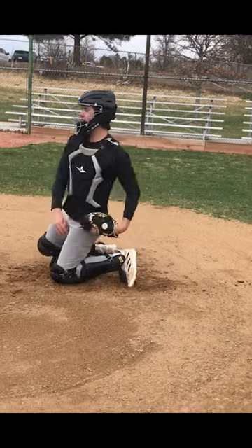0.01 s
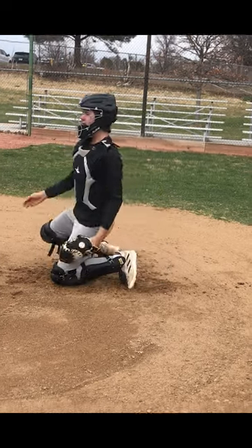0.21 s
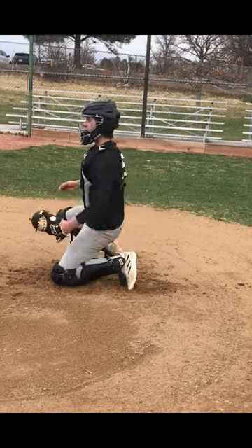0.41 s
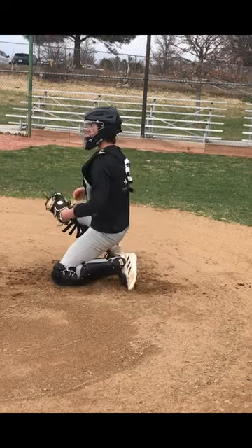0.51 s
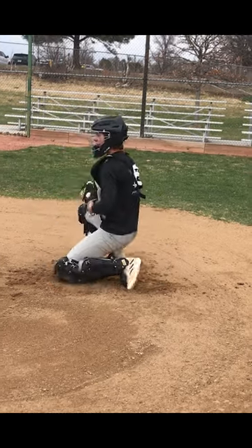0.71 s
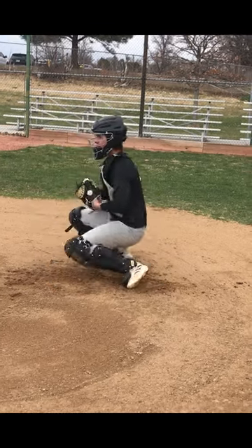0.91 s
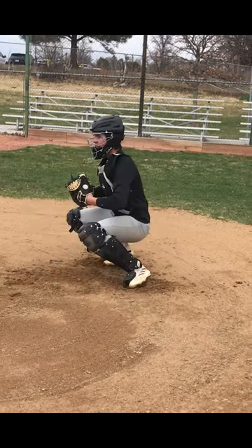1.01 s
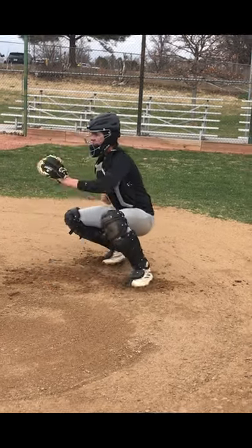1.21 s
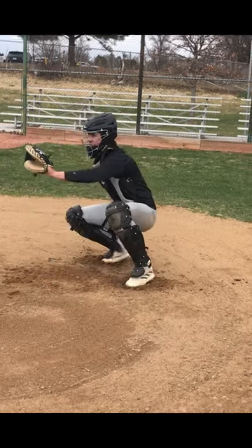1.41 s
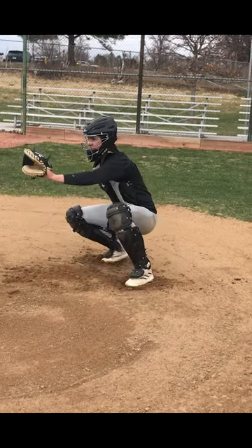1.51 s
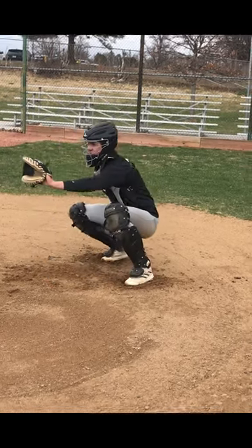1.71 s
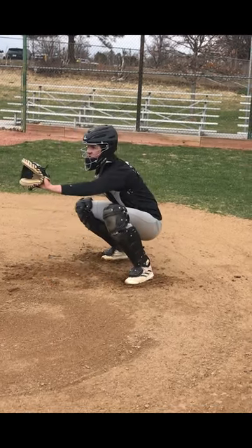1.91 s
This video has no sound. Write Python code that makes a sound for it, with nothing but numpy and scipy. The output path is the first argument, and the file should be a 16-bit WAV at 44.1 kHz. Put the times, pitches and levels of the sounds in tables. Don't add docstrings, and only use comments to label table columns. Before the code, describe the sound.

One sharp leathery mitt pop comes early, trailed at once by clicking guards and soft padded thuds, then faint gritty shuffling that settles into quiet wind rumble outdoors, captured by a handheld phone.

```python
import sys
import numpy as np
from scipy import signal
from scipy.fft import rfft, irfft
from scipy.io import wavfile
from scipy.ndimage import uniform_filter1d

SR = 44100
rng = np.random.default_rng(int(sys.argv[2]) if len(sys.argv) > 2 else 0)


def transcribe(signal):
    frames = np.atleast_2d(signal).T
    limited = np.clip(frames, -1, 1)
    pcm = np.round(limited * 32767).astype(np.int16)
    wavfile.write(sys.argv[1], SR, pcm)


def nominal_scale(level):
    x = np.asarray(level, float) / 20
    return 10 ** x


N = 88200


def curve(points, hz):
    f, db = np.transpose(points)
    f = np.r_[f[0] * .6, f, f[-1] * 1.1]
    db = np.r_[-50, db, -60]
    return nominal_scale(np.interp(np.log(hz + 1), np.log(f), db))


def evened(x):
    return x / np.sqrt(np.mean(x ** 2) + 1e-20)


def coloured(x, points, tilt_db=0):
    hz = np.fft.rfftfreq(len(x), 1 / SR)
    tilt = nominal_scale(tilt_db * np.log2(hz / 4000 + 0.0009))
    return evened(irfft(rfft(x) * curve(points, hz) * tilt, len(x)))


def add(mix, start_s, sound):
    part = mix[round(start_s * SR):][:len(sound)]
    part += sound[:len(part)]


def ring(db, hz, t60_s, rise_s=0.0003):
    t = np.arange(6000) / SR
    envelope = nominal_scale(db - 60 * t / t60_s) * (1 - np.exp(-t / rise_s))
    return envelope * np.sin(2 * np.pi * hz * t)


def burst(db, t60_s, points, tilt_db=0):
    t = np.arange(4096) / SR
    envelope = nominal_scale(db - 60 * t / t60_s) * np.minimum(t / 0.00026, 1)
    return envelope * coloured(rng.standard_normal(4096), points, tilt_db)


def snap(db, points):
    n = np.arange(1024)
    pulse = coloured(n == 64, points)
    return -nominal_scale(db) * pulse / pulse.max() * np.minimum(n / 40, 1)


def bed(points, size, patchy_db, flicker_db):
    frames = 4 * N // size + 5
    hz = np.fft.rfftfreq(size, 1 / SR)
    real, imag, patches = rng.standard_normal((frames, len(hz), 3)).T
    patches = uniform_filter1d(patches, size=8, axis=0)
    patches = evened(uniform_filter1d(patches, size=8, axis=1))
    flicker = evened(uniform_filter1d(rng.standard_normal(frames), size=4))
    level = nominal_scale(patchy_db * patches + flicker_db * flicker)
    spectra = (real + 1j * imag) * curve(points, hz)[:, None] * level
    return evened(signal.istft(spectra, nperseg=size, noverlap=3 * size // 4)[1][:N])


def air():
    wind_db, road_db = -50.5, -55
    # time in seconds, wind level in dB, road level in dB.
    gusts = [(0.0, -52.5, -55.5), (0.23, -53.5, -55.5), (0.56, -52, -57), (0.73, -50.5, -56.5),
             (1.09, -52.5, -57), (1.54, -52.5, -55.5), (2.0, -52, -58)]
    # frequency in Hz, level in dB per Hz.
    wind_spectrum = [(28, -25), (42, 0), (70, -1.5), (115, 1), (160, -6.5), (270, -10), (380, -18),
                     (500, -28)]
    # frequency in Hz, level in dB per Hz.
    road_spectrum = [(330, -9.5), (520, -13.5), (680, -2.5), (950, -1.5), (1650, -17.5), (2800, -30.5),
                     (5000, -34), (15500, -41)]
    s, wind_course_db, road_course_db = np.transpose(gusts)
    t = np.arange(N) / SR
    wind_gain = nominal_scale(wind_db + np.interp(t, s, wind_course_db - wind_course_db.mean()))
    road_gain = nominal_scale(road_db + np.interp(t, s, road_course_db - road_course_db.mean()))
    wind = wind_gain * bed(wind_spectrum, size=2048, patchy_db=.2, flicker_db=.1)
    road = road_gain * bed(road_spectrum, size=512, patchy_db=.6, flicker_db=.4)
    return wind + road


def scuffs():
    grains_per_s, grain_db, hiss_gain = 7000, 2.6, .8
    # peak in seconds, rise in seconds, fall in seconds, rms in dB, brightness in dB per octave.
    strokes = [(.02, 0.095, 0.15, -61, -4), (.352, 0.011, 0.011, -51.5, -6),
               (.37, 0.066, 0.038, -55.5, -4.5), (.393, .012, 0.017, -64.5, -3.5),
               (.47, 0.061, 0.063, -65.5, -5), (0.689, 0.11, 0.016, -63, -0.5),
               (.722, 0.018, 0.02, -52.5, 1), (.727, 0.008, 0.011, -65, -6), (.755, 0.018, 0.03, -60, 1.5),
               (.86, 0.1, 0.22, -63, -6.5), (1.205, .012, 0.016, -69, 8), (1.33, 0.12, 0.12, -73.5, 0.5),
               (1.46, .025, .025, -64, -7), (1.487, 0.026, 0.015, -63.5, -4), (1.488, 0.019, 0.011, -75, 3),
               (.55, 0.041, 0.053, -76, 0), (1.08, 0.086, 0.14, -82, 6), (1.8, .1, 0.17, -73.5, -0.5)]
    # frequency in Hz, level in dB per Hz.
    grit_spectrum = [(710, -48), (1200, -2.5), (2570, -7), (3110, -8), (7810, -15), (8510, -12),
                     (15500, -23.5)]
    t, out = np.arange(N) / SR, np.zeros(N)
    sizes = nominal_scale(grain_db * np.minimum(rng.exponential(1, N), 5)) * rng.choice([-1., 1.], N)
    grains = evened(sizes * (rng.random(N) < grains_per_s / SR))
    grit = grains + hiss_gain * rng.standard_normal(N)
    for peak_s, rise_s, fall_s, db, tilt_db in strokes:
        stroke = np.exp(-((t - peak_s) / np.where(t < peak_s, rise_s, fall_s)) ** 2)
        out += nominal_scale(db) * stroke * coloured(grit, grit_spectrum, tilt_db)
    return out


def pocket_air():
    level_db, first_db, swell_s, bite_s, t60_s = -5.3, -7.1, .0023, .00033, .009
    end_hz, sag_hz, sag_s = 300, 736, .0047
    t = np.arange(3000) / SR
    phase = 2 * np.pi * (end_hz * t + sag_hz * sag_s * (1 - np.exp(-t / sag_s)))
    swell_db = first_db * np.maximum(1 - t / swell_s, 0)
    decay_db = -60 * np.maximum(t - swell_s, 0) / t60_s
    return (1 - np.exp(-t / bite_s)) * nominal_scale(level_db + swell_db + decay_db) * np.sin(phase)


def pop():
    pop_s = .24715
    # start in seconds, rms in dB, T60 in seconds, brightness in dB per octave.
    cracks = [
        (0.2421, -51, 0.041, -3),
        (.2470, -29, .005, 2.5),
        (0.2481, -30, 0.008, 1.5),
        (0.249, -45, 0.045, 2),
        (0.2672, -48, 0.012, 4),
        (0.2648, -50, 0.008, 10),
    ]
    # frequency in Hz, level in dB per Hz.
    crack_spectrum = [(1700, -20), (2600, -5), (4200, -5), (5500, -2.5), (7500, -9.5), (9500, -22.5),
                      (12000, -29), (15500, -40)]
    # delay in seconds, level in dB, frequency in Hz, T60 in seconds.
    laces = [
        (0.0012, -31, 5900, 0.0073),
        (0.0018, -34, 4100, 0.010),
        (0.0013, -25, 7290, 0.008),
        (0.0014, -39, 4600, 0.0054),
        (.0005, -30, 2550, 0.013),
        (0.0033, -30, 2080, 0.013),
        (0.00093, -35, 2850, 0.009),
        (0.001, -39, 4400, 0.0065),
        (.0178, -40, 8200, .006),
        (0.0198, -45, 8400, .006),
    ]
    out = np.zeros(N)
    add(out, pop_s, pocket_air())
    add(out, pop_s + .00008, ring(.8, 1374, .0067, rise_s=.0012))
    add(out, pop_s + .00093, ring(-5.8, 200, .019, rise_s=.005))
    add(out, pop_s + .00004 - 64 / SR, snap(-11.5, crack_spectrum))
    for delay_s, db, hz, t60_s in laces:
        add(out, pop_s + delay_s, ring(db, hz, t60_s))
    for start_s, db, t60_s, tilt_db in cracks:
        add(out, start_s, burst(db, t60_s, crack_spectrum, tilt_db))
    return out


def click(out, start_s, db, t60_s, points):
    add(out, start_s, burst(db, t60_s, points))
    add(out, start_s - 50 / SR, snap(db + 5.5, points))


def slides():
    # start in seconds, level in dB, start pitch in Hz, pitch drop in Hz per second, length in seconds.
    glides = [
        (.2476, -25, 5900, 800000, .0026),
        (.3704, -35, 3800, 400000, .0022),
        (.3878, -41, 950, 9000, .0105),
    ]
    out = np.zeros(N)
    for start_s, db, hz, drop_hz_per_s, length_s in glides:
        t = np.arange(0, length_s, 1 / SR)
        envelope = nominal_scale(db) * np.sin(np.pi * t / length_s) ** .5
        add(out, start_s, envelope * np.sin(2 * np.pi * (hz - drop_hz_per_s * t / 2) * t))
    return out


def gear():
    # start in seconds, click level in dB, ring level in dB, ring frequency in Hz, ring T60 in seconds.
    knocks = [(0.2652, -44, -27, 1260, 0.011), (0.3035, -54, -50, 1160, 0.029),
              (0.3105, -56, -35, 1430, 0.014), (0.3112, -54, -44, 4700, .006),
              (.3165, -54, -46, 1000, .015), (0.3237, -49, -40, 1490, 0.0054),
              (0.3295, -45, -51, 1190, 0.016), (0.334, -33.5, -30.5, 1274, 0.012),
              (0.3371, -39, -36, 1950, 0.012), (0.3429, -41, -36, 1090, 0.012),
              (0.3466, -30.5, -39, 5960, 0.0039), (0.3478, -42, -38, 3300, 0.010),
              (0.3515, -43, -41, 1700, 0.014), (0.357, -41, -38, 1110, 0.014),
              (0.3681, -39, -37, 1140, 0.011), (.3702, -34.5, -47, 3530, 0.0099),
              (0.3718, -46, -28, 2820, 0.010), (0.3781, -50, -49, 750, .03), (0.3885, -60, -51, 770, 0.029),
              (.4590, -64, -49, 1550, 0.022), (.4900, -65, -49, 2230, 0.014),
              (0.599, -55.5, -57, 2520, 0.015), (0.675, -58, -51, 2600, .01), (.7195, -50, -46, 1910, .012),
              (0.7252, -57, -43, 2700, 0.02), (.7320, -56, -44.5, 2070, 0.021),
              (1.4890, -49, -52, 6760, 0.0031), (1.4945, -58, -57, 3500, .008)]
    # frequency in Hz, level in dB per Hz.
    click_spectrum = [(480, -40), (700, -2.5), (2130, -4), (4680, -14.5), (5900, -10.5), (8870, -18),
                      (15500, -62)]
    # start in seconds, rms in dB.
    ticks = [(0.333, -50.5), (0.3468, -52), (.3685, -54), (.3532, -48), (0.338, -57), (.3435, -61),
             (.3575, -58), (0.371, -54), (.3775, -60), (.7115, -56), (.7205, -55), (.7275, -56),
             (.7330, -57), (.7480, -57), (.7540, -57), (.4940, -58), (.4985, -59), (0.5012, -63),
             (.6400, -66), (.5580, -60), (0.599, -58), (.6200, -62), (.6760, -58), (1.015, -62),
             (1.339, -63), (1.4843, -57), (1.489, -59), (1.524, -64)]
    # frequency in Hz, level in dB per Hz.
    tick_spectrum = [(2500, -13), (5000, -1), (8500, -5), (12000, 2), (15500, -14)]
    # start in seconds, level in dB, frequency in Hz, T60 in seconds.
    thuds = [(.3360, -29.5, 302, 0.027), (.3430, -38, 250, 0.03), (.3530, -37, 57, 0.066),
             (.3830, -38, 104, 0.043), (.3790, -39, 70, 0.048), (.3690, -33.5, 250, 0.034),
             (.3350, -32, 650, .025), (0.44, -50.5, 690, 0.073), (.3690, -31, 730, .025),
             (.3672, -29, 907, 0.031), (.3560, -37, 1050, .02), (.3920, -42, 740, 0.032),
             (.2492, -29.5, 270, 0.028), (.3570, -36, 718, 0.031), (.2540, -36.5, 126, 0.08)]
    out = np.zeros(N)
    for start_s, click_db, ring_db, hz, t60_s in knocks:
        click(out, start_s, click_db, .007, click_spectrum)
        add(out, start_s, ring(ring_db, hz, t60_s))
        add(out, start_s, ring(ring_db - 7.0, 1.277 * hz, 0.66 * t60_s))
    for start_s, db in ticks:
        click(out, start_s, db, .0041, tick_spectrum)
    for start_s, db, hz, t60_s in thuds:
        add(out, start_s, ring(db, hz, t60_s, rise_s=0.0018))
    return out


def field(x):
    level_db, t60_s, gap_s = -24.5, .15, .004
    t = np.arange(8000) / SR
    taps = rng.standard_normal(8000) * nominal_scale(-60 * t / t60_s) * (t > gap_s)
    return nominal_scale(level_db) * signal.fftconvolve(x, taps / np.linalg.norm(taps))[:N]


def scene():
    far = air() + scuffs()
    near = pop() + slides() + gear()
    return (far + near + field(near))[None]


def band_limit(x):
    return signal.sosfilt(signal.butter(12, 16380, fs=SR, output="sos"), x)


def record(dry):
    low_cut_hz, edge_hz = 43, 15950
    # centre in Hz, width in Hz, gain in dB.
    port = [(5020, 330, -4), (7900, 270, -2.5), (8660, 1100, 2), (10300, 350, -3)]
    hz = np.fft.rfftfreq(2048, 1 / SR)
    db = sum(gain_db * np.exp(-((hz - f) / width_hz) ** 2) for f, width_hz, gain_db in port)
    db = db - 70 * (hz > edge_hz)
    port_taps = signal.firwin2(1025, hz, nominal_scale(db), fs=SR)
    heard = signal.oaconvolve(dry, port_taps[None], "same")
    heard = signal.sosfilt(signal.butter(2, low_cut_hz, "high", fs=SR, output="sos"), heard)
    return band_limit(heard)


dry = scene()
out = record(dry)
transcribe(out)
```